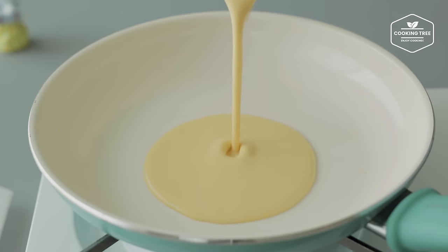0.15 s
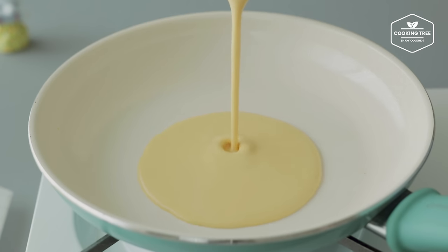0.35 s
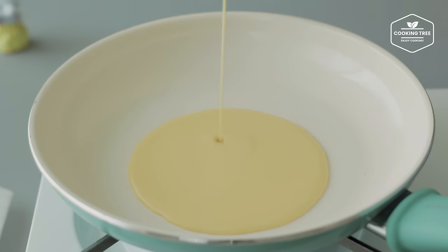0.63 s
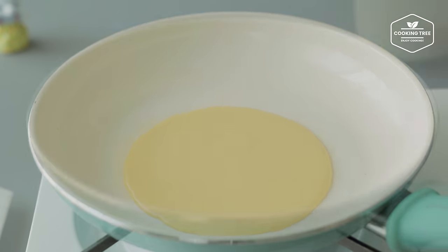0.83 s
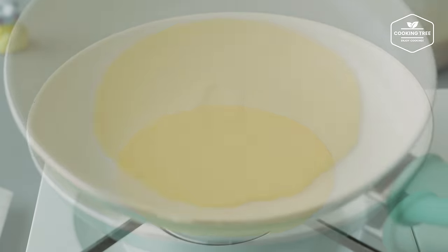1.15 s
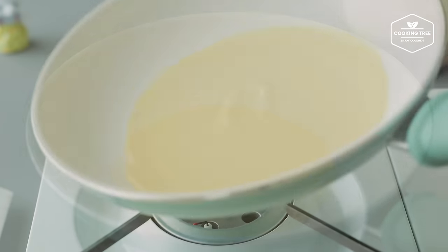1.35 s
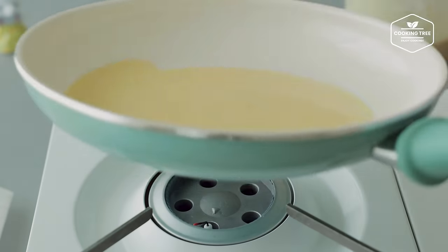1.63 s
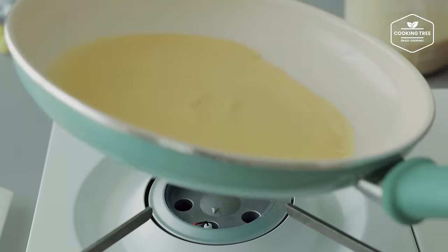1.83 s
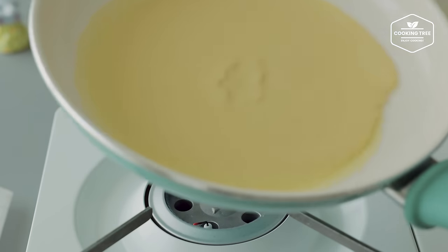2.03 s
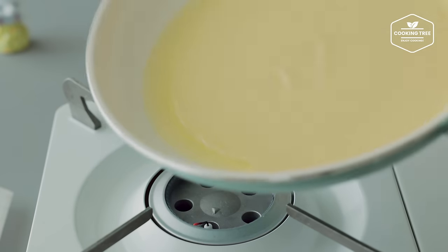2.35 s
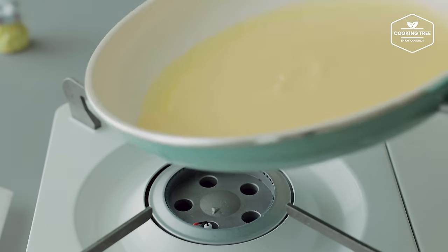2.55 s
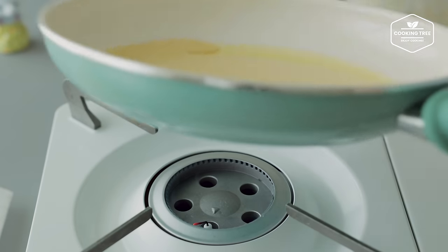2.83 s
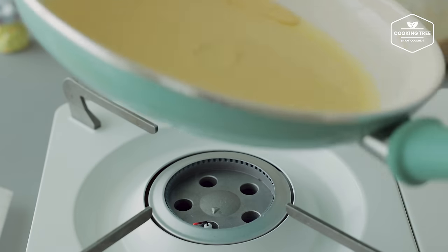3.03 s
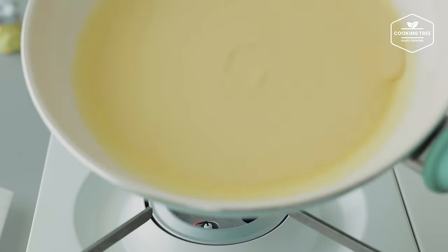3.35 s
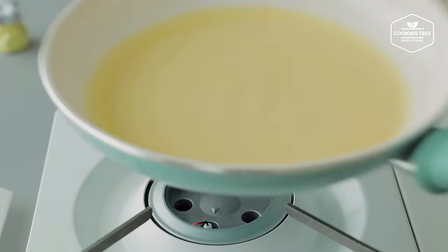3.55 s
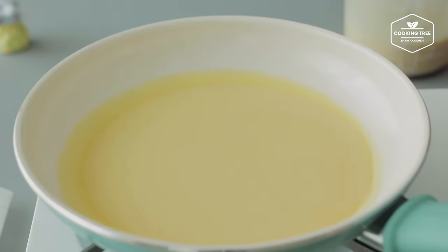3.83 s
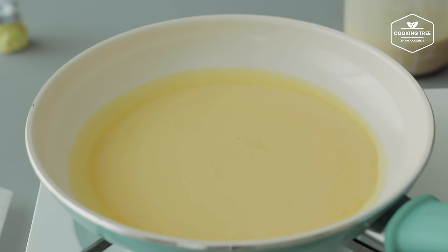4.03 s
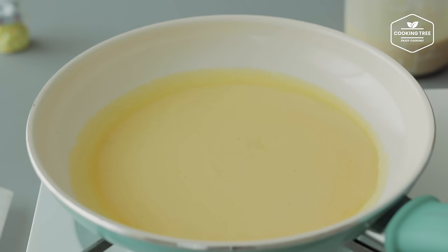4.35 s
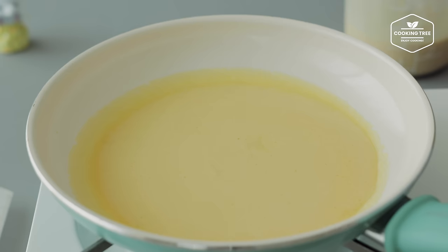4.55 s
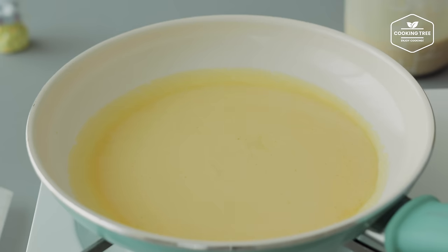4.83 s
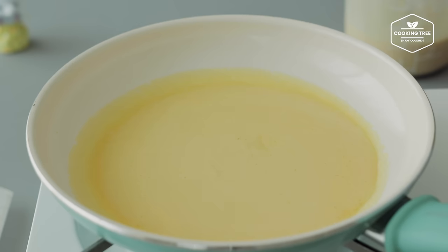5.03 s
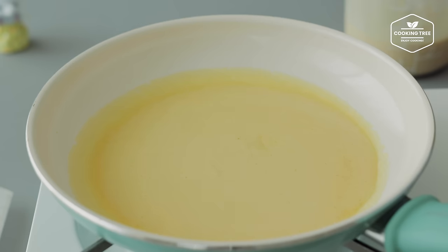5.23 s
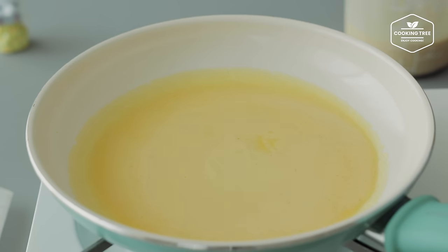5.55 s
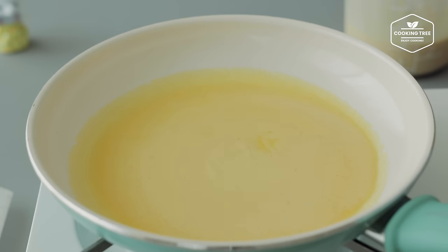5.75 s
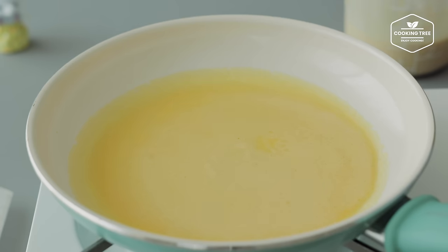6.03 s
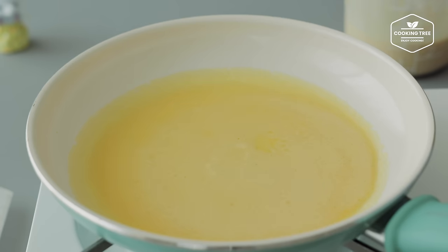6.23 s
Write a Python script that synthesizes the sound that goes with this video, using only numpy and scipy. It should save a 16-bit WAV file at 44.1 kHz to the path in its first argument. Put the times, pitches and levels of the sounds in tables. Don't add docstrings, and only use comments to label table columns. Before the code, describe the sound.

Wet batter sizzles loudly in a hot pan, the pan knocks off the stove grid and swirls, then the sizzle dwindles to tiny pops.

```python
import sys
import numpy as np
from scipy import signal
from scipy.fft import rfft, irfft
from scipy.io import wavfile
from scipy.ndimage import uniform_filter1d

SR = 44100
rng = np.random.default_rng(int(sys.argv[2]) if len(sys.argv) > 2 else 0)


def voltage_ratio(level):
    return 10 ** (np.asarray(level, float) / 20)


def persist_wave(psi):
    counts = np.round(np.clip(psi, -1, 1) * 32767).astype(np.int16)
    wavfile.write(sys.argv[1], SR, np.atleast_2d(counts).T)


N = 282240
TIME = np.arange(N) / SR

LIFT_S, LIFT_LENGTH_S = 1.05, 0.13


def unit(x):
    return x / np.sqrt(np.mean(x ** 2))


def curves(table):
    s, *columns = np.transpose(table)
    return [np.interp(TIME, s, c) for c in columns]


def band(x, hz, width_hz):
    return signal.lfilter(*signal.iirpeak(min(hz, .45 * SR), hz / width_hz, fs=SR), x)


def modes(x, table):
    return sum(voltage_ratio(db) * band(x, hz, width_hz) for hz, width_hz, db in table)


def colour(x, table, size=4096):
    hz, db = np.transpose(table)
    gain = np.interp(np.log(np.fft.rfftfreq(size, 1 / SR) + 1), np.log(hz), db) * np.log(10) / 20
    cepstrum = irfft(gain)
    cepstrum[1:size // 2] *= 2
    cepstrum[size // 2 + 1:] = 0
    return signal.fftconvolve(x, irfft(np.exp(rfft(cepstrum))))[:N]


def walk(rate):
    k = int(SR / rate)
    steps = np.repeat(rng.standard_normal(N // k + 1), k)
    return 1.2 * uniform_filter1d(uniform_filter1d(steps, k), k)[:N]


def bursts(rate, spread_db):
    when, sign = rng.random(N), rng.choice([-1., 1.], size=N)
    size = np.minimum(rng.exponential(size=N), 5)
    share = np.clip(rate / SR, 0, 1)
    return unit((when < share) * sign * voltage_ratio(spread_db * size) / np.sqrt(share))


def lifted():
    return np.clip((TIME - LIFT_S) / LIFT_LENGTH_S, 0, 1)


# (time [s], level of the middle-sized bubbles [dB], fineness of the foam [dB])
BOIL = [(0, -24, 0.5), (.78, -26, -0.5), (1.07, -26, -0.5), (1.1, -28, -2.5), (1.38, -28.5, 0),
        (2.25, -34, 3.5), (3.35, -33, 0), (3.52, -31, -1.5), (3.85, -34.5, -2), (4.22, -38.5, 2),
        (4.61, -46.5, 5), (4.9, -56, 1.5), (5.2, -58.5, 4), (5.7, -61.5, 8), (6.4, -63, 7)]
# (level over the middle size [dB], share of the fineness followed [dB per dB])
BUBBLE_SIZES = [(-5, -0.029), (0, -0.098), (-5.5, 0.66), (-9.5, 0.78)]
STARVE_DB, STARVE_SLOPE = -43, 0.6
LANDING_S, LANDING_LENGTH_S, LANDING_DB = 3.9, 0.19, 2
REST_RING_DB, BATTER_DAMPS_DB_PER_S, REST_LEFT_DB = 6.5, 7.5, -15
LIFT_RING_DB, SWING_S, SWING_DB, SWING_RISE_S, SWING_FALL_S = -9.5, 2.1, 12, 2.4, 0.43
COOL_DAMPS = .4
BURSTS_LOG, REST_BURSTS_LOG, BURSTS_LOG_PER_DB = 4.05, .5, 0.06


def boil():
    up = lifted()
    boil_db, fine_db = curves(BOIL)
    cool_db = np.maximum(STARVE_DB - boil_db, 0)

    levels_db = [boil_db + db + share * fine_db for db, share in BUBBLE_SIZES]
    landing_db = LANDING_DB * np.exp(-((TIME - LANDING_S) / LANDING_LENGTH_S) ** 2)
    levels_db[0] = levels_db[0] - STARVE_SLOPE * cool_db + landing_db

    density = BURSTS_LOG + REST_BURSTS_LOG * (1 - up) - BURSTS_LOG_PER_DB * cool_db

    rest_db = (1 - up) * (REST_RING_DB - BATTER_DAMPS_DB_PER_S * TIME) + up * REST_LEFT_DB
    rest_db = rest_db - COOL_DAMPS * cool_db

    rise = np.exp((TIME - SWING_S) / SWING_RISE_S)
    fall = np.exp((SWING_S - TIME) / SWING_FALL_S)
    swing = np.where(TIME < SWING_S, rise, fall)
    lift_db = LIFT_RING_DB + SWING_DB * swing - 25 * (1 - up) - COOL_DAMPS * cool_db
    return levels_db, density, rest_db, lift_db


# (start [s], end [s], pitch [Hz], width [Hz], level over the sizzle [dB])
TILT_RINGS = [(0, 0.46, 2700, 98, 1.5), (2, 1.6, 6730, 160, -3), (2, 1.6, 5880, 110, -8),
              (4, 1.6, 7700, 90, -2), (2, 2.35, 7130, 130, 1), (3, 3.2, 9020, 150, -14.5),
              (2.5, 2.5, 7100, 200, -4), (3, 2.92, 5500, 260, 1), (3.05, 3.1, 5500, 180, -3),
              (3, 3.7, 4800, 180, -4), (4, 3.9, 1480, 78.6, 4), (3.42, 3.645, 3650, 270, -9),
              (3.5, 3.2, 3850, 630, -8), (2.16, 2.3, 820, 19, 12)]


def tilt_rings(swarm):
    out = 0
    for start, end, hz, width_hz, db in TILT_RINGS:
        fade = np.interp(TIME, [start - .08, start, end, end + 0.044], [0, 1, 1, 0])
        out = out + voltage_ratio(db) * fade * band(swarm, hz, width_hz)
    return out


SIZE_EDGES_HZ = [700, 2300, 4600, 9500, 15700]


def by_size(swarm, levels_db):
    spectrum, octave = rfft(swarm), np.log2(np.fft.rfftfreq(N, 1 / SR) + 1)
    edges, out = np.log2(SIZE_EDGES_HZ), 0
    above = [np.clip(.5 + (octave - e) / .5, 0, 1) for e in edges[1:-1]]
    above = [np.ones(len(octave))] + above + [0]
    for k, db in enumerate(levels_db):
        inside = irfft(spectrum * (octave > edges[k]) * (octave < edges[k + 1]), N)
        slow_power = uniform_filter1d(uniform_filter1d(inside ** 2, size=5000), size=5000)
        soft_band = irfft(spectrum * (above[k] - above[k + 1]), N)
        out = out + voltage_ratio(db) / np.sqrt(slow_power) * soft_band
    return out


# (pitch [Hz], density [dB per Hz])
BURST_COLOUR = [(300, -36), (700, -27), (1000, -13), (1400, -8.5), (1650, -9), (2000, -6.5), (2600, -5),
                (3500, 0.5), (4150, -4), (4700, -9.5), (6500, -10), (8500, -10.5), (11000, -13),
                (16000, -15)]
# (pitch [Hz], width [Hz], level over the sizzle [dB])
PAN_REST = [(761, 16.7, 15), (1486, 97, -4.5), (1930, 220, -6), (2680, 210, -1.5), (3740, 220, -7),
            (4200, 59.94, 2), (4590, 98, -6.5), (5370, 42, 5), (5820, 106, 5.5), (6920, 98, -3),
            (7540, 210, 2), (8890, 170, -4), (9400, 170, -3), (11528, 54, 0), (12800, 92, -3),
            (14340, 200, -14)]
# (pitch [Hz], width [Hz], level over the sizzle [dB])
PAN_LIFT = [(821, 33, 9), (1380, 180, -3), (1830, 120, -6.5)]
BOWL_HZ = 3600
FLAT_S, FLAT_RISE_S, FLAT_BOWL_WIDTH_HZ, FLAT_BOWL_DB = 4.1, .3, 600, -1


def sizzle():
    levels_db, density, rest_db, lift_db = boil()
    surge_db = .5 * walk(12) + 0.41 * walk(40)
    snap = bursts(.3 * 10 ** density, spread_db=2.5)
    swarm, neighbour = 0, walk(23)
    for hz in 500 * 2 ** np.arange(0, 5.6, .5):
        own = walk(20)
        clicks = bursts(10 ** density, spread_db=1.5) + 0.61 * min(hz / 9000, 1.3) * snap
        swarm = swarm + voltage_ratio(surge_db + .5 * (own + neighbour)) * band(clicks, hz, 0.51 * hz)
        neighbour = own
    swarm = colour(swarm, BURST_COLOUR)

    rung = swarm + voltage_ratio(rest_db) * modes(swarm, PAN_REST) + voltage_ratio(lift_db) * modes(swarm, PAN_LIFT)
    rung = rung + tilt_rings(swarm)
    flat = np.clip((TIME - FLAT_S) / FLAT_RISE_S, 0, 1)
    rung = rung + voltage_ratio(FLAT_BOWL_DB) * flat * band(swarm, BOWL_HZ, FLAT_BOWL_WIDTH_HZ)
    return by_size(rung, levels_db)


# (pitch [Hz], density [dB per Hz])
KITCHEN_AIR = [(18, -36), (30, -0.5), (208, 0), (370, -3), (422, -2.5), (577, -4.5), (641, -4), (1140, -9),
               (1230, -14), (1640, -14.5), (2920, -15), (3600, -2), (4680, -16.5), (7900, -13),
               (15600, -14)]
# (pitch [Hz], width [Hz], level over the kitchen air [dB])
DRONES = [(53.6, 11, 2), (144, 4, -11), (209.8, 6.7, 6.5), (421.5, 5, 2), (624, 6.9, 1), (1238, 16, 8.5)]
KITCHEN_DB, AIR_SWAY_DB = -54, .5
RUMBLE_DB, RUMBLE_SWAY_DB, RUMBLE_FADES_DB_PER_S = 5.5, 0.5, 3.5


def kitchen():
    air = unit(colour(rng.standard_normal(N), KITCHEN_AIR, size=16384))
    low_cut = signal.butter(4, 31, "high", fs=SR, output="sos")
    air = signal.sosfilt(low_cut, air + modes(air, DRONES))
    bass = signal.sosfiltfilt(signal.butter(2, 420, fs=SR, output="sos"), air)
    early_bass_db = RUMBLE_DB - RUMBLE_FADES_DB_PER_S * TIME + RUMBLE_SWAY_DB * walk(8.6)
    rumble_db = (1 - lifted()) * early_bass_db + AIR_SWAY_DB * walk(4.9)
    return voltage_ratio(KITCHEN_DB) * (air + (voltage_ratio(rumble_db) - 1) * bass)


# (time [s], length [s], pitch [Hz], width [Hz], level [dB])
RUBS = [
    (.02, .18, 95, 80, -56),
    (1.045, .03, 320, 70, -50),
    (1.065, 0.035, 420, 50, -43.5),
    (1.15, .14, 160, 60, -55),
    (3.11, .11, 52, 18, -56),
]


def rubs():
    grit, out = rng.standard_normal(N), 0
    for s, length, hz, width_hz, db in RUBS:
        swell = np.sin(np.pi * np.clip((TIME - s) / length, 0, 1))
        out = out + voltage_ratio(db) * swell * unit(band(band(grit, hz, width_hz), hz, width_hz))
    return out


# (time [s], level [dB], push length [ms], brightness [dB per octave])
KNOCKS = [
    (1.051, -56, 1.2, 10.5),
    (1.072, -53.5, 1.6, 12.5),
    (1.099, -42, 3.5, 6),
    (1.1195, -36, .5, 4.5),
    (1.13, -36, 4.5, -8.5),
]
# (pitch [Hz], level [dB], t60 [s])
GRID_MODES = [(123, -4.5, .13), (141.5, -5.5, 0.43), (175, -9, 0.26), (215.5, -4, 0.2), (341, -5, 0.26),
              (397, -8.5, 0.23), (480, -15, 0.16), (683, -11.5, 0.11), (854, -8.5, .08), (851.9, -9, .07)]


def knocks():
    out, t = np.zeros(N + SR), np.arange(SR // 2) / SR
    for s, db, ms, bright_db in KNOCKS:
        push = np.hanning(int(ms * SR / 1000) + 3)
        ring = 0
        for hz, mode_db, t60 in GRID_MODES:
            decay = np.exp(-np.log(1000) * t / t60)
            ring = ring + voltage_ratio(mode_db + bright_db * np.log2(hz / 200)) * decay * np.sin(2 * np.pi * hz * t)
        ring = signal.fftconvolve(ring, voltage_ratio(db) * push / push.sum())
        start = int(s * SR)
        out[start:start + len(ring)] += ring
    return signal.sosfilt(signal.butter(3, 88, "high", fs=SR, output="sos"), out[:N])


SPIT_RATE, DRYING_S, DRY_RATE = 10, 4.2, 40
SPIT_DB, SPIT_FOLLOWS, SPIT_SCATTER_DB = -4, .65, 1.5
WET_SPIT_HZ, DRY_SPIT_HZ, SPIT_OCTAVES = 10000, 8000, .35


def spits():
    s, keep, size, pitch = rng.random((int(DRY_RATE * N / SR), 4)).T
    s = s * N / SR
    wet = s < DRYING_S
    boil_db = curves(BOIL)[0][(s * SR).astype(int)]
    db = SPIT_DB + SPIT_FOLLOWS * boil_db - SPIT_SCATTER_DB * np.log(1 - .95 * size)
    octaves = SPIT_OCTAVES * np.where(wet, 1, 3) * (pitch - .5)
    hz = np.where(wet, WET_SPIT_HZ, DRY_SPIT_HZ) * 2 ** octaves
    heard = (s > LIFT_S) & (keep < np.where(wet, SPIT_RATE / DRY_RATE, 1))
    return list(np.transpose([s, db, hz])[heard])


# (time [s], peak
# level [dB], pitch [Hz])
CLEAR_POPS = [(4.7892, -26, 8600), (4.8582, -29, 10900), (4.8883, -33, 10500), (4.9092, -28, 8700),
              (4.9257, -29, 8500), (4.9285, -27, 7600), (4.9312, -30, 6300), (5.0433, -31, 7700),
              (5.1629, -29, 7900), (5.1985, -29, 9300), (5.2726, -28, 8200), (5.3105, -32, 9200),
              (5.4043, -30, 7900), (5.4623, -30, 8800), (5.4765, -30, 11200), (5.5155, -30, 11000),
              (5.7416, -21.5, 5600), (5.747, -30, 10600), (5.8048, -33, 8300), (5.8185, -33, 7100),
              (5.9661, -29, 11900), (6.0671, -34, 9000), (6.1104, -28, 6900), (6.1244, -30, 9200),
              (6.1546, -30, 10700), (6.1892, -26, 11100), (6.2088, -29, 10500), (6.2132, -31, 10100),
              (6.2171, -33, 4700), (6.2817, -33, 7500),
              (1.1725, -17, 10000), (1.6259, -16, 8800), (1.7011, -19, 11400), (2.3857, -19, 10400),
               (2.4664, -19, 10700), (2.8219, -22, 9200), (3.6857, -21, 10100), (3.7627, -22, 9900),
               (3.9906, -20, 9100), (4.086, -22, 8600), (4.2349, -22, 5500), (4.2568, -21, 8100),
               (4.2644, -20, 7200), (4.4429, -21, 7400), (4.5059, -23, 4900), (4.5749, -25, 7400),
               (4.6144, -26, 5700), (4.6878, -28, 7300)]
BOWL_WIDTH_HZ, BOWL_DB, SPLASH_DB, POP_DB = 270, 6, -25, .8
RIM_SHADOW_HZ, RIM_SHADOW_WIDTH_HZ, RIM_SHADOW = 6000, 3500, .38


def pops():
    table = CLEAR_POPS + spits()
    out, t = np.zeros(N + 48), np.arange(48) / SR
    for (s, db, hz), loose in zip(table, rng.random(len(table))):
        cycles = .9 * hz * (hz / 6000) ** .25 * t
        wave = cycles * np.exp(-cycles * (2.2 + 1.2 * loose)) * np.sin(2 * np.pi * cycles)
        wave = np.diff(wave, prepend=0)
        start = int(s * SR) - 3
        out[start:start + 48] += voltage_ratio(db) * wave / np.ptp(wave) * 1.65 * (hz / 7000) ** .45
    out = out[:N]
    out = out + voltage_ratio(BOWL_DB) * band(out, BOWL_HZ, BOWL_WIDTH_HZ)
    scatter = rng.standard_normal(300) * np.exp(-np.arange(300) / 50)
    out = out + voltage_ratio(SPLASH_DB) * signal.fftconvolve(out, scatter)[:N]
    return voltage_ratio(POP_DB) * (out - RIM_SHADOW * band(out, RIM_SHADOW_HZ, RIM_SHADOW_WIDTH_HZ))


def scene():
    return np.tile(sizzle() + kitchen() + rubs() + knocks() + pops(), (2, 1))


def top_cut(x):
    return signal.sosfilt(signal.butter(12, 17080, fs=SR, output="sos"), x)


def record(dry):
    return top_cut(dry)


dry = scene()
out = record(dry)
persist_wave(out)
```